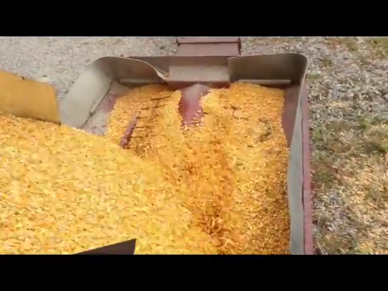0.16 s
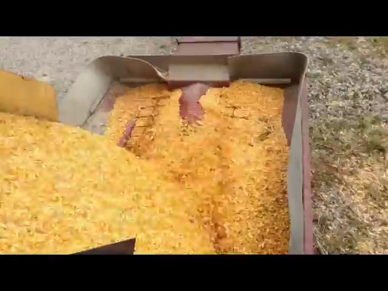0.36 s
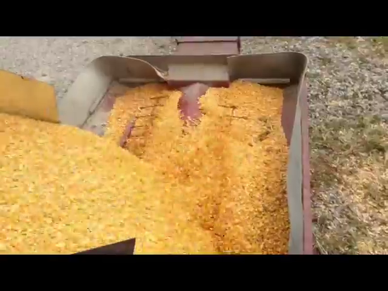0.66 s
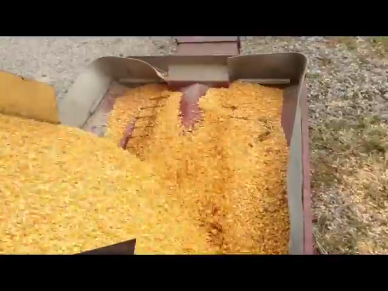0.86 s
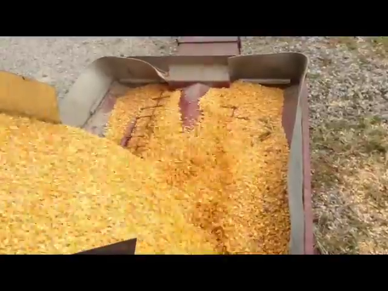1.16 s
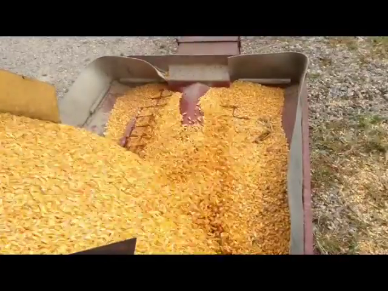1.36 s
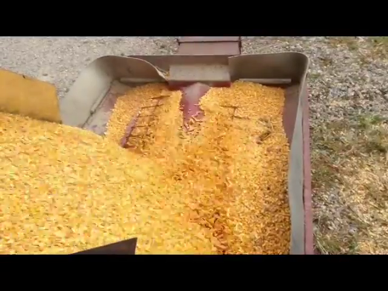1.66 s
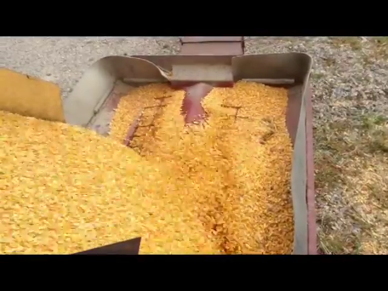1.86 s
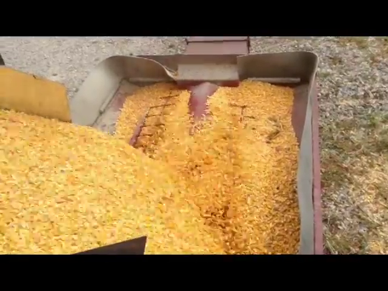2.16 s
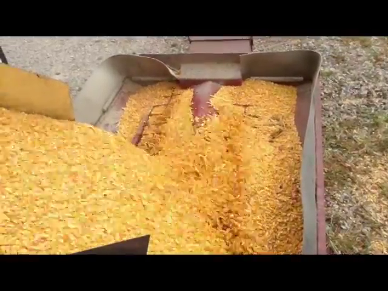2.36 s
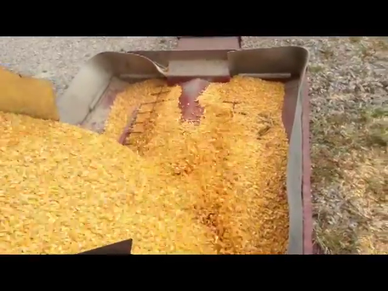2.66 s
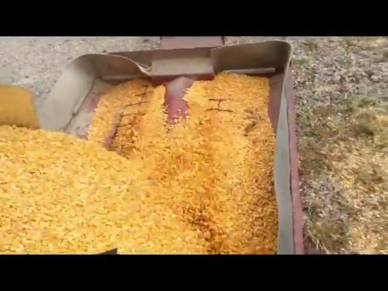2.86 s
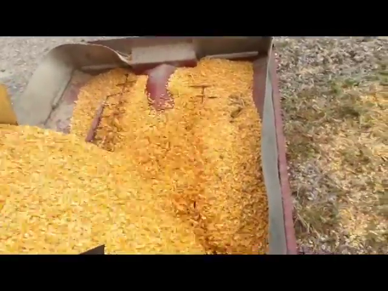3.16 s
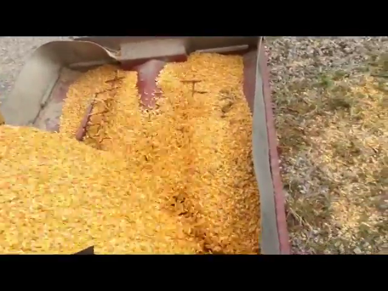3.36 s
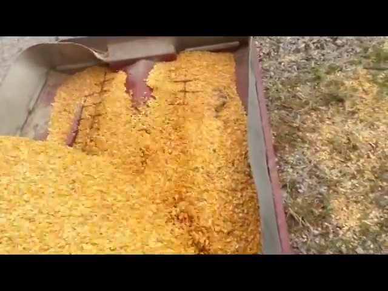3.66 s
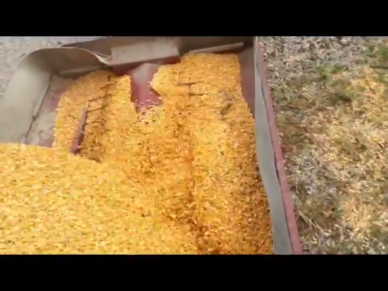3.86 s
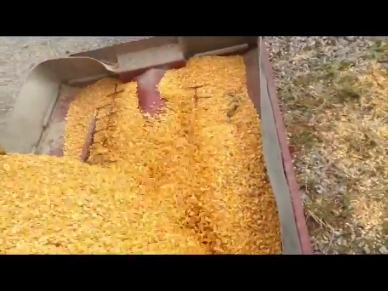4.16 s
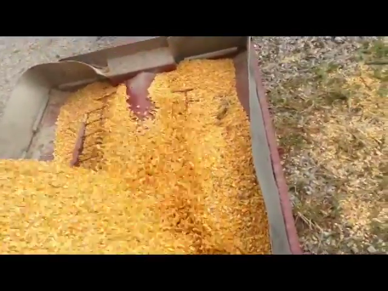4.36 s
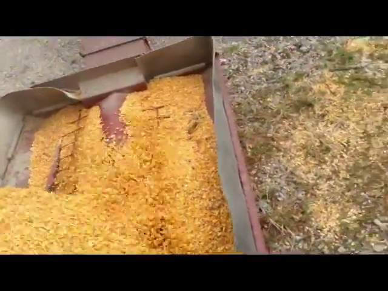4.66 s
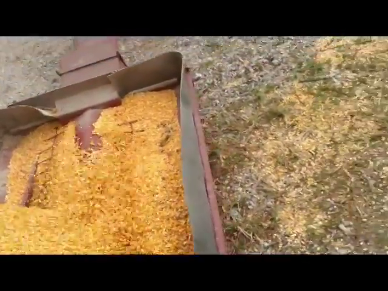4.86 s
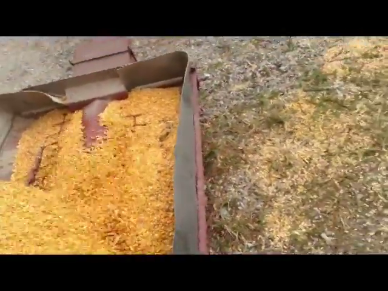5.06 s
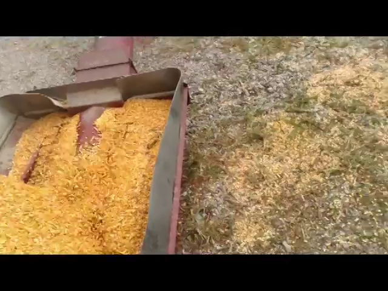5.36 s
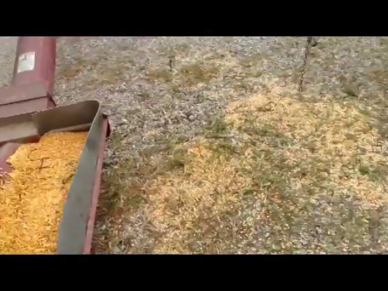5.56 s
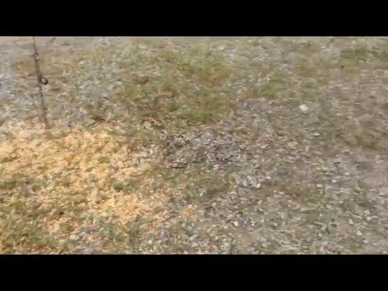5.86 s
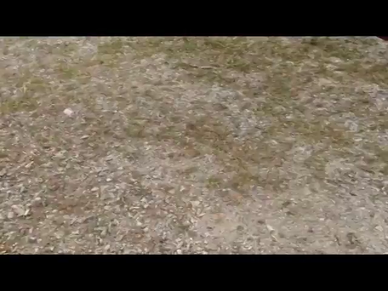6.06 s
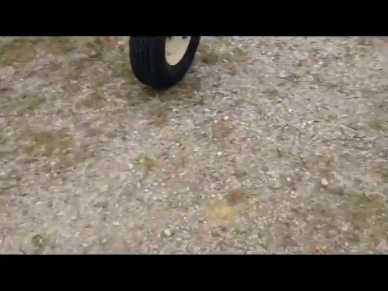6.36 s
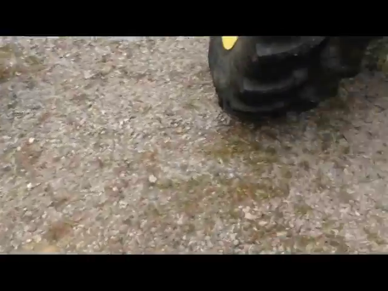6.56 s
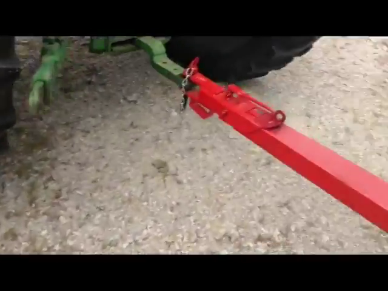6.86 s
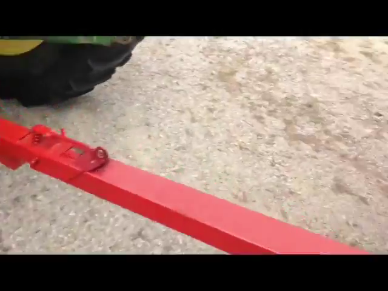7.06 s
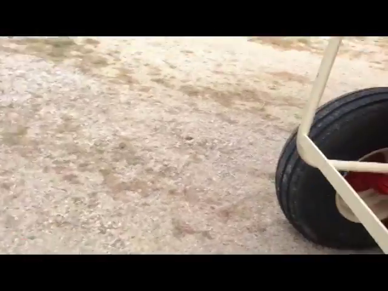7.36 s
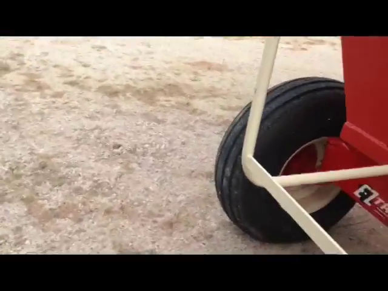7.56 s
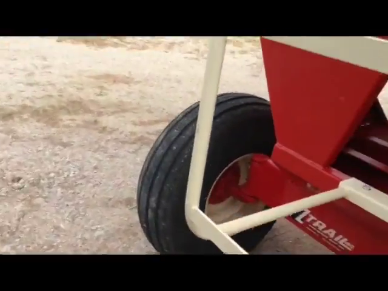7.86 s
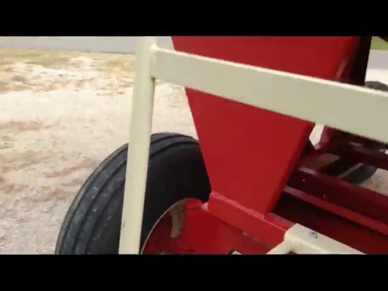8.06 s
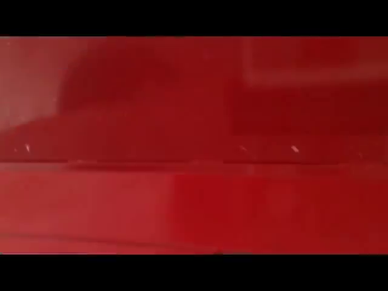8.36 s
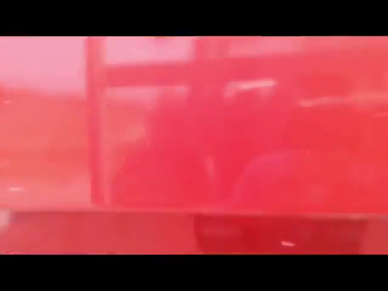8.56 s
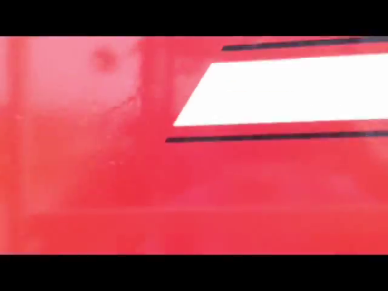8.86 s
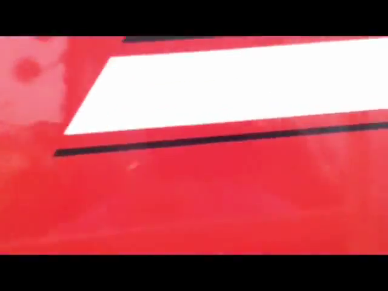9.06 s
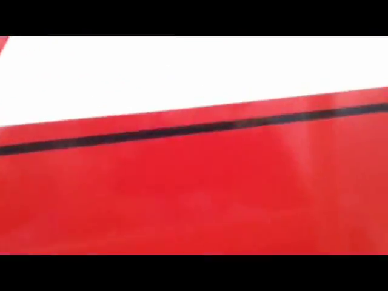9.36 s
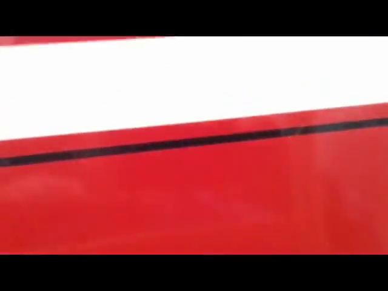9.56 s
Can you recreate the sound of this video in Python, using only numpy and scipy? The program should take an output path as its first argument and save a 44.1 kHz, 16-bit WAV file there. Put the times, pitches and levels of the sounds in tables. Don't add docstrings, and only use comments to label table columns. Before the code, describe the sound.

A dense rush of dry kernels hisses into a steel hopper above a low auger drone, then the microphone turns away and bumps a panel.

```python
import sys
import numpy as np
from scipy import signal
from scipy.fft import rfft, irfft, next_fast_len
from scipy.io import wavfile
from scipy.ndimage import uniform_filter1d, map_coordinates

SR = 44100
rng = np.random.default_rng(int(sys.argv[2]) if len(sys.argv) > 2 else 0)


def convert_level_to_amplitude(level_db):
    exponent = np.asarray(level_db, float) / 20
    return 10 ** exponent


def transcribe(u):
    v = np.clip(np.atleast_2d(u).T, -1, 1)
    q = np.round(v * 32767).astype(np.int16)
    wavfile.write(sys.argv[1], SR, q)


N = 428652


def unit(x):
    return x / np.sqrt(np.mean(x ** 2) + 1e-20)


def curves(rows):
    s, *cols = np.transpose(rows)
    return [np.interp(np.arange(N) / SR, s, c) for c in cols]


def swells(rows):
    t = np.arange(N) / SR
    return sum(db * np.exp(-.5 * ((t - s) / abs(length_s)) ** 2) for s, db, length_s in rows)


def wobble(rate_hz):
    knots = rng.standard_normal(int(N * rate_hz / SR) + 4)
    return map_coordinates(knots, [np.arange(N) * rate_hz / SR])


def filtered(x, response):
    m = next_fast_len(N + 8192)
    return irfft(rfft(x, m) * response(np.fft.rfftfreq(m, 1 / SR)), m)[:N]


def coloured(x, points):
    f, db = np.transpose(points)
    return unit(filtered(x, lambda hz: convert_level_to_amplitude(np.interp(np.log(hz + 1), np.log(f), db))))


def smoothed(x, rows, columns):
    return uniform_filter1d(uniform_filter1d(x, size=rows, axis=0), size=columns, axis=1)


def collisions(share, spread_db, patchy_db):
    draw = rng.random((2, N))
    sizes = rng.standard_normal(N) * convert_level_to_amplitude(-spread_db * np.log(draw[1] + 1e-9))
    z = signal.stft((draw[0] < share) * sizes, nperseg=512)[2]
    field = smoothed(rng.standard_normal(z.shape), 7, 10)
    return signal.istft(z * convert_level_to_amplitude(patchy_db * unit(field)), nperseg=512)[1][:N]


# frequency in Hz, density in dB per Hz.
KERNEL_SPECTRUM = [(1530, -42), (2600, -11.5), (2990, -6.5), (3550, 0), (6280, 0), (6870, -0.5),
                   (8970, -3.5), (11400, -6), (14200, -14.5), (15300, -18.5)]
# frequency in Hz, density in dB per Hz.
HOPPER_SPECTRUM = [(1100, -51), (1400, -5), (1650, 0), (2400, 0), (2900, -2), (3400, -1), (4500, -62)]
# time in s, level in dB.
FLOW_DB = [(0, -14), (.5, -14), (1.65, -14.5), (2.0, -14.2), (2.65, -14), (3.3, -14.6), (4.1, -14),
           (4.55, -15), (4.95, -14), (5.65, -14.5), (6.05, -13.5), (6.5, -14.5), (6.85, -13), (7.15, -14.5),
           (8.0, -14.5), (8.5, -13), (8.8, -15), (9.72, -17)]
# time in s, change in dB, length in s.
SPURTS_DB = [(.16, -0.5, .03), (.53, -1, .04), (.68, -0.2, .02), (.83, -1, 0.027), (1.0, -1, 0.018),
             (1.55, 0, .04), (2.35, -2, 0.036), (3.28, -0.5, .04), (3.83, 0, .03), (4.0, -2, .02),
             (4.22, 1, .03), (4.5, -0.5, 0.033), (5.17, -1.4, 0.044), (5.3, -0.8, 0.033), (6.45, -0.5, .03),
             (7.0, -0.5, .03), (7.42, -1, 0.028), (7.95, 0.5, .03), (8.17, -2.5, 0.024),
             (8.26, -2.5, 0.028), (8.42, -0.5, 0.025), (8.54, 0, .03), (8.7, -2, 0.023), (8.85, 0, .03),
             (8.97, 2.5, 0.023), (9.02, -1, .03), (9.27, -2, 0.046), (9.63, -1.5, .03)]
# time in s, turn from the stream 0-1, distance from it in m, auger rise in dB.
MIC_PATH = [(0, 0.05, 1.02, 0.9), (1.7, 0.08, 1, -0.5), (2.6, 0.17, 1, .5), (3.15, 0.26, 1, 0.5),
            (4.2, .2, .8, 0), (5.2, .3, 0.98, .5), (5.8, .45, 1.5, 5), (6.2, 0.45, 2.1, 3),
            (6.95, 1, 3, 5.5), (7.5, 0.63, 3.2, 6), (8.0, 0.2, 2.6, 5.5), (8.3, 0.8, 3.6, 5),
            (8.55, 0.44, 3, 2), (8.8, 0.3, 3, -1), (9.1, 0.2, 2, 1), (9.72, 0, 2.1, -0.5)]


def corn():
    shade_db, air_db, air_db_per_m = 7.5, 5, 1.5
    rattle_rest_db, rattle_auger_share = -22.5, 0.44
    wagon_s, flutter_db = 8.2, 1.2
    flow_db, = curves(FLOW_DB)
    turned, metres, auger_db = curves(MIC_PATH)
    spurt_db = swells(SPURTS_DB)
    surge = .5 * wobble(14) + 1.1 * wobble(35) + 0.55 * wobble(9)

    hiss = coloured(collisions(share=.6, spread_db=0.5, patchy_db=0.8), KERNEL_SPECTRUM)
    treble = filtered(hiss, lambda hz: 1 / (1 + (7800 / (hz + 1)) ** 8))
    air = filtered(hiss, lambda hz: 1 / (1 + (12800 / (hz + 1)) ** 16))
    beside = np.clip((np.arange(N) / SR - wagon_s) / .2, 0, 1)
    shade = convert_level_to_amplitude(3.0 - shade_db * turned + (0.14 + flutter_db * beside) * wobble(16))
    veil = convert_level_to_amplitude(air_db - air_db_per_m * (metres - 1.5))
    hiss = hiss + (shade - 1) * treble + (veil - shade) * air

    rattle = coloured(collisions(share=.4, spread_db=0.15, patchy_db=1.1), HOPPER_SPECTRUM)
    rattle_db = rattle_rest_db + rattle_auger_share * auger_db + 1.15 * turned
    rattle_db = rattle_db + spurt_db + 0.25 * wobble(9)
    hiss_db = flow_db + spurt_db + 3.0 + 0.39 * surge
    return convert_level_to_amplitude(hiss_db) * hiss + convert_level_to_amplitude(rattle_db + 0.19 * surge) * rattle


def orders(hz, table, drift):
    turn = 2 * np.pi * np.cumsum(hz * (1 + drift * wobble(4))) / SR
    out = np.zeros(N)
    for multiple, db in table:
        out += convert_level_to_amplitude(db + 3 * wobble(2.2)) * np.sin(int(multiple) * turn + 6 * rng.random())
    return out


# frequency in Hz, density in dB per Hz.
RUMBLE_SPECTRUM = [(90, -40), (150, -22), (190, 1), (250, 1.5), (500, 2), (700, -0.5), (1100, -37)]
# frequency in Hz, density in dB per Hz.
CASING_SPECTRUM = [(400, -28), (620, -6.5), (850, 1.5), (1100, 0.5), (1300, -0.5), (1700, -14.5),
                   (2500, -25)]
# frequency in Hz, density in dB per Hz.
THROB_SPECTRUM = [(25, -34), (78, -30), (100, -12), (125, -17), (148, 7), (175, 0.5), (230, -22)]
# multiple of the engine rate, level in dB over the throb.
ENGINE_ORDERS = [(2, -15.5), (3, -6), (4, -5), (6, -4.5), (8, -9)]
# multiple of the gear rate, level in dB over the rumble.
GEAR_ORDERS = [(2, -31), (3, -26), (8, -17), (9, -18), (10, -14), (11, -14), (12, -19)]
# time in s, change in dB, length in s.
RUMBLE_DIP = (6.5, -4.5, 0.18)
# time in s, rise in dB, length in s.
SLUGS = [
    (.38, 7, .05),
    (.93, 8, .05),
    (2.42, 8, .06),
    (4.2, 7, .04),
    (7.95, 3, 0.099),
    (8.3, 6, 0.24),
]


def drive():
    rumble_rest_db, casing_rest_db, throb_rest_db = -34, -31, -44.5
    engine_hz, gear_hz = 43.6, 48.83
    auger_db = curves(MIC_PATH)[2]
    rumble_db = rumble_rest_db + 1.07 * auger_db + swells([RUMBLE_DIP]) + 0.6 * wobble(10)
    casing_db = casing_rest_db + .95 * auger_db + 0.51 * wobble(9)
    throb_db = throb_rest_db + swells(SLUGS) + 0.78 * wobble(8.3)
    engine_db = uniform_filter1d(throb_db, size=SR // 2) - 3.0

    rumble = coloured(collisions(share=.3, spread_db=0.8, patchy_db=0.7), RUMBLE_SPECTRUM)
    casing = coloured(collisions(share=.3, spread_db=0.6, patchy_db=1.27), CASING_SPECTRUM)
    throb = coloured(rng.standard_normal(N), THROB_SPECTRUM)
    gears = orders(gear_hz, GEAR_ORDERS, drift=.007)
    engine = orders(engine_hz, ENGINE_ORDERS, drift=.006)
    tube = convert_level_to_amplitude(rumble_db) * (rumble + gears) + convert_level_to_amplitude(casing_db) * casing
    return tube + convert_level_to_amplitude(throb_db) * throb + convert_level_to_amplitude(engine_db) * engine


# frequency in Hz, width in Hz, start in s, end in s, level in dB.
HUMS = [(236, 13, 6.45, 8.2, -38.5), (350, 9, 4.2, 6.5, -40), (350, 9, 6.6, 8.4, -41),
        (485, 18, 3.7, 6.5, -46), (1078, 30, 6.8, 8.2, -36.5), (598, 14, 7.2, 8.6, -42),
        (265, 14, 8.7, 10.2, -44), (2800, 500, 8.05, 8.8, -24), (1280, 180, 9.0, 11, -35),
        (4600, 500, 8.8, 10.2, -25), (7600, 900, 8.6, 9.9, -23.5), (6500, 700, 8.9, 10.2, -24)]


def hums():
    flicker_base_db, flicker_db_per_khz, fade_s = 2, .2, 0.39
    t, out, m = np.arange(N) / SR, np.zeros(N), next_fast_len(N)
    roar, f = rfft(rng.standard_normal(m)), np.fft.rfftfreq(m, 1 / SR)
    for hz, width_hz, start_s, end_s, db in HUMS:
        band = unit(irfft(roar / (1 + (2 * (f - hz) / width_hz) ** 2), m)[:N])
        flicker_db = (flicker_base_db + flicker_db_per_khz * hz / 1000) * wobble(18)
        facing = np.clip(np.minimum(t - start_s, end_s - t) / fade_s, 0, 1)
        out += convert_level_to_amplitude(db + flicker_db) * band * facing
    return out


# time in s, peak in dB, brightness in dB, boom in dB.
CONTACTS = [
    (8.198, -11, 7, -30),
    (8.211, -12, 6, -30),
    (8.219, -9, 2, -30),
    (8.228, -12, 1, 0),
    (8.26, -15, -10, -30),
]
# frequency in Hz, level in dB, t60 in s.
PANEL_MODES = [(270, -1, .07), (320, -3, .06), (610, -4, .1), (770, -5, .09), (960, -8, .08),
               (1500, -9, .05), (2035, -7, .07)]
# frequency in Hz, level in dB, t60 in s.
BOOM_MODES = [(180, 3, .09), (172, -8, .8)]


def bump():
    crack_db, crack_t60_s, crack_hz, crack_width_hz, onset_s = 4.5, .06, 1750, 550, .0015
    knocks, cracks, t = np.zeros(N + SR), np.zeros(N + SR), np.arange(SR // 2) / SR

    def ring(hz, db, t60_s):
        return convert_level_to_amplitude(db - 60 * t / t60_s) * np.sin(2 * np.pi * hz * t)

    for s, db, bright_db, boom_db in CONTACTS:
        modes = np.zeros(len(t))
        for hz, level_db, t60_s in PANEL_MODES:
            tilt_db = bright_db * np.log10(hz / 300) + rng.normal(0, 1.5)
            modes += ring(hz, level_db + tilt_db, t60_s)
        for hz, level_db, t60_s in BOOM_MODES:
            modes += ring(hz, level_db + boom_db, t60_s)
        span = slice(round(s * SR), round(s * SR) + len(t))
        knocks[span] += convert_level_to_amplitude(db - 3.5) * modes * (1 - np.exp(-t / onset_s))
        fall_db = db + bright_db + crack_db - 60 * t / crack_t60_s
        cracks[span] += convert_level_to_amplitude(fall_db) * rng.standard_normal(len(t))
    cracks = filtered(cracks[:N], lambda hz: 1 / (1 + ((hz - crack_hz) / crack_width_hz) ** 4))
    return cracks + filtered(knocks[:N], lambda hz: 1 / np.sqrt(1 + (145 / (hz + 1)) ** 8))


# time in s, reflected share 0-1.
WAGON_ECHO = [(0, 0), (8.45, 0.06), (8.7, 0.01), (9.0, 0.04), (9.25, 0.3), (9.72, 0.16)]


def scene():
    extra_path_s = 0.00077
    direct = corn() + drive() + hums()
    share, = curves(WAGON_ECHO)
    echo = filtered(direct, lambda hz: np.exp(-2j * np.pi * hz * extra_path_s) / (1 + (hz / 3000) ** 4))
    return ((direct + share * echo) / np.sqrt(1 + .5 * share ** 2) + bump())[None]


# time in s, dropping threshold in dB against the local mean.
DROP_BELOW_DB = [(0, -2.4), (1.8, -2.5), (2.6, -3.6), (5.8, -3.6), (7, -2), (8.3, -1.8), (9, -2.6),
                 (9.72, -3.2)]


def starved(x):
    hz, t, z = signal.stft(x, SR, nperseg=2048)
    hz, power = hz[:, None], np.abs(z) ** 2
    edge_db = np.interp(t, *np.transpose(DROP_BELOW_DB)) - .9 * np.clip(13.8 - hz / 1000, 0, None)
    keep = (smoothed(power, 5, 3) > convert_level_to_amplitude(edge_db) ** 2 * smoothed(power, 31, 25)) | (hz < 7000)
    return signal.istft(z * keep, SR, nperseg=2048)[1][:N]


def low_pass(x):
    return signal.sosfilt(signal.butter(12, 15890, fs=SR, output="sos"), x)


def record(dry):
    ceiling, knee, bass_cut_hz, top_hz = 1.15, 3.5, 75, 15380
    x = dry[0] / (1 + np.abs(dry[0] / ceiling) ** knee) ** (1 / knee)
    x = filtered(x, lambda hz: (hz < top_hz) / np.sqrt(1 + (bass_cut_hz / (hz + 1)) ** 4))
    mix = starved(x)[None]
    return low_pass(mix)


dry = scene()
out = record(dry)
transcribe(out)
```